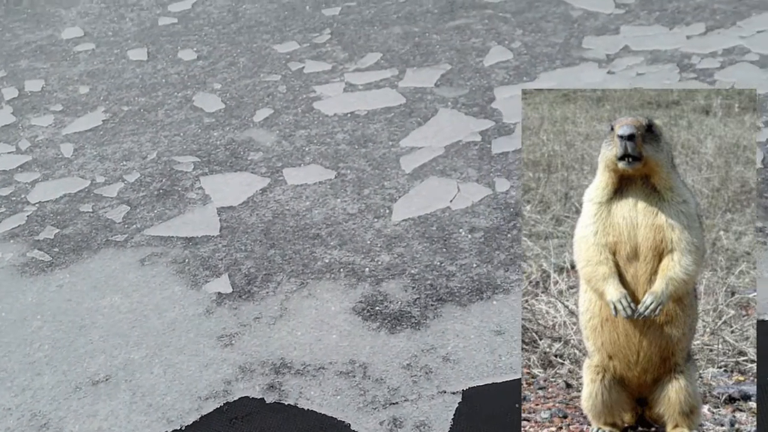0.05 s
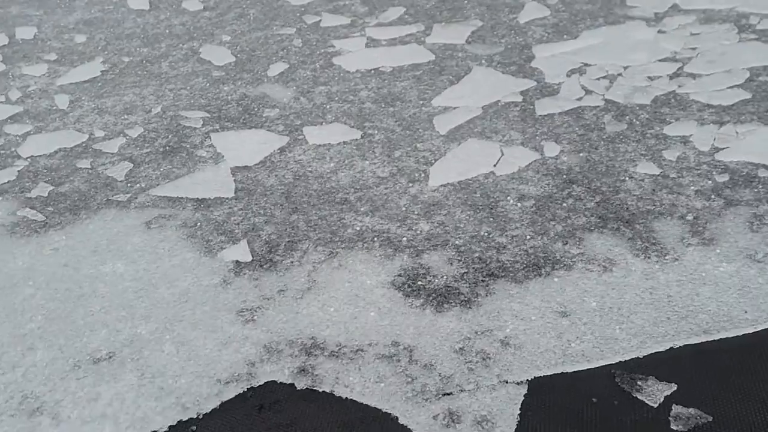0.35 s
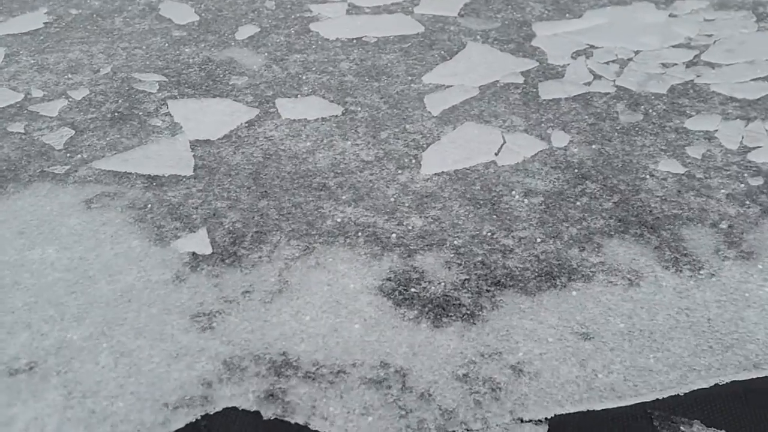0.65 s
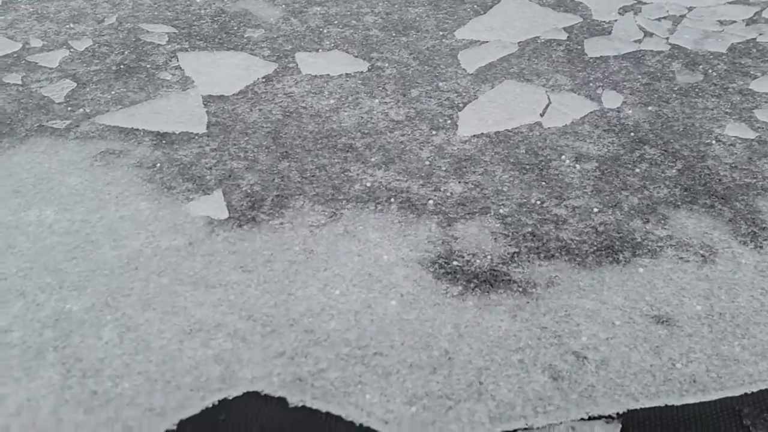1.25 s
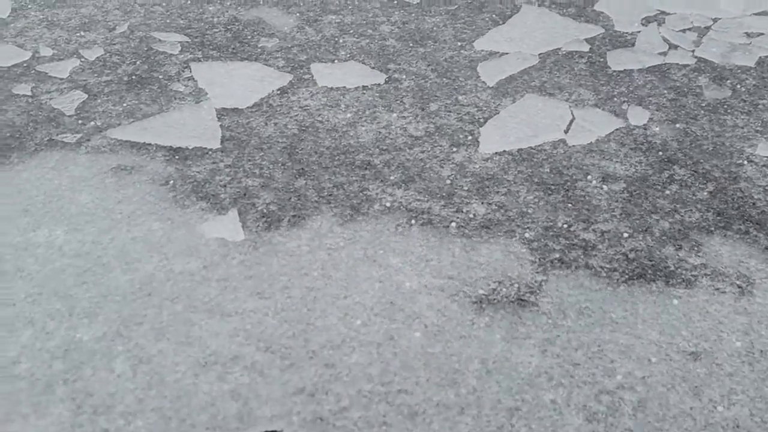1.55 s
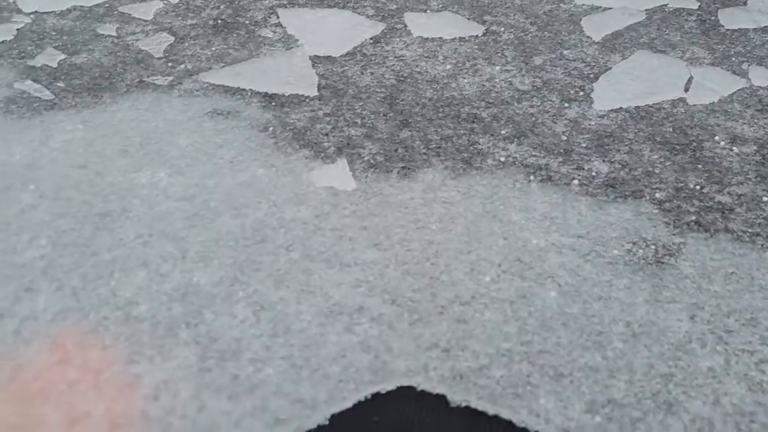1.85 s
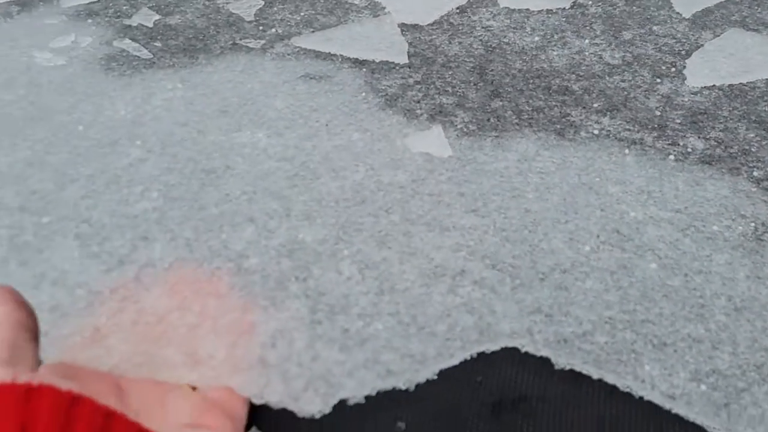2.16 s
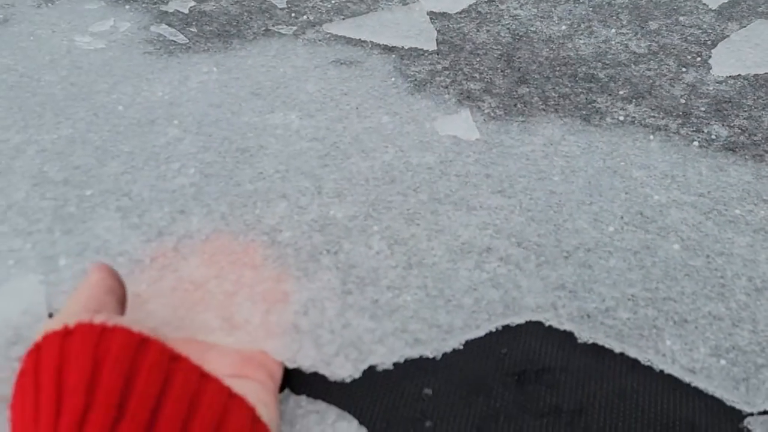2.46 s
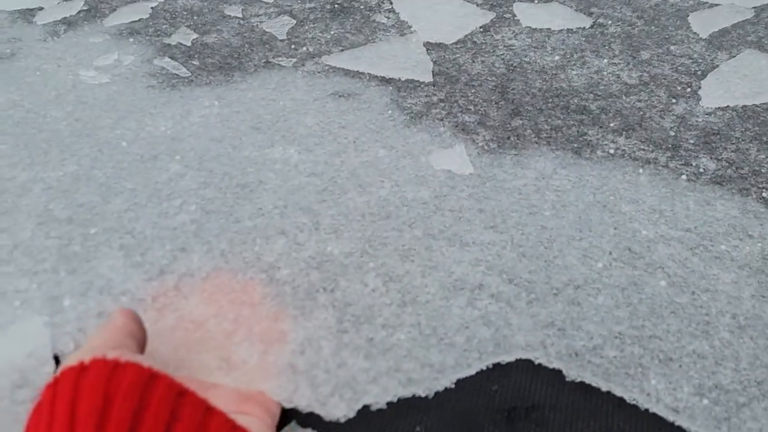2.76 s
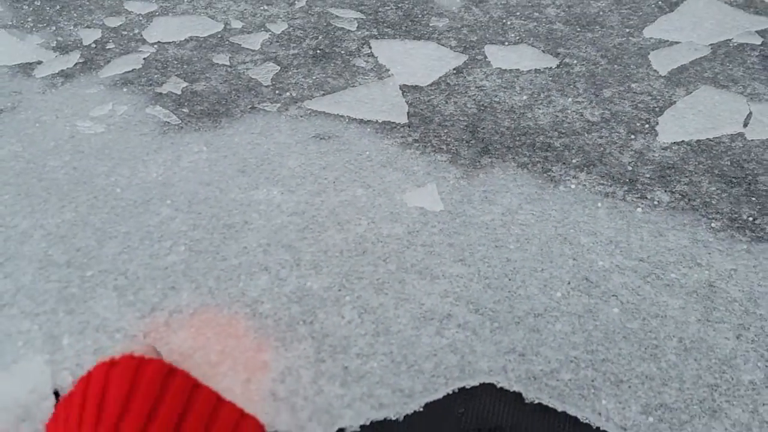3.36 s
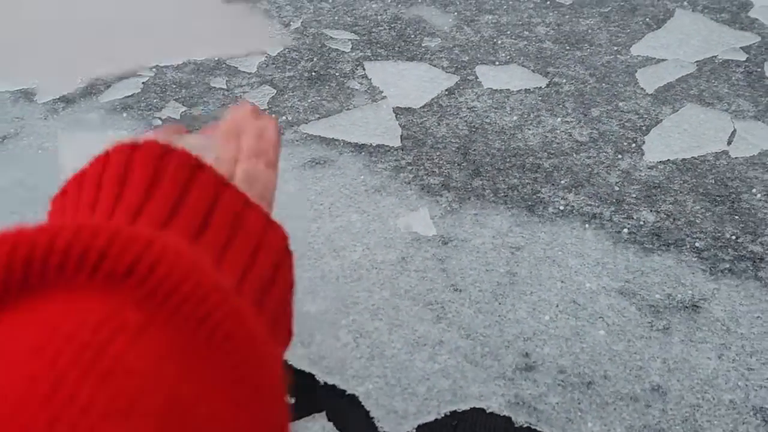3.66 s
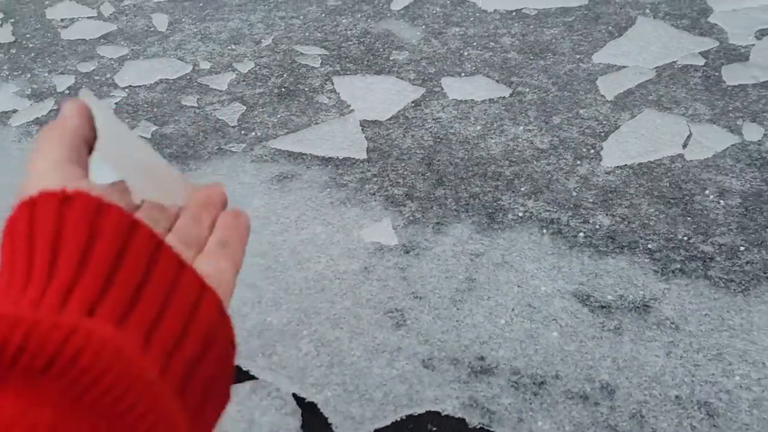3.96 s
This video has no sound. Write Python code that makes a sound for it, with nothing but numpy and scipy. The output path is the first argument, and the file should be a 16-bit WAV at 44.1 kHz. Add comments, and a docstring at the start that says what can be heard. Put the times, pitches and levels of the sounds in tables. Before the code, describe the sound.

Thin ice scrapes in short, soft shoves from about 0.2 seconds as a hand pushes it, with small ticks and clinking shards. The crackling thickens around 2.3 seconds and the sheet snaps at 2.8. Louder cracks follow at 3.5 and 3.7 seconds, then the pieces grind together and rock on the water with dull thuds. A low outdoor rumble and faint hiss run underneath.

```python
"""A hand pushes a sheet of thin ice over the water, outdoors and close by.
A low rumble and a faint hiss lie underneath throughout. From the start the strained sheet fizzes.
From 0.2 s it scrapes over loose ice in short shoves, and shards clink; from 0.7 s it ticks as it bends.
At 2.8 s it snaps, then harder at 3.5 and 3.7 s; the pieces grind together and rock on the water."""
import sys
import numpy as np
from scipy import signal
from scipy.fft import rfft, irfft, next_fast_len
from scipy.io import wavfile

SR = 44100
rng = np.random.default_rng(int(sys.argv[2]) if len(sys.argv) > 2 else 0)


def transcribe(signal):
    """Save signal, clipped to [-1, 1], as a 16-bit WAV file at the path in sys.argv[1]."""
    frames = np.atleast_2d(signal).T
    limited = np.clip(frames, -1, 1)
    pcm = np.round(limited * 32767).astype(np.int16)
    wavfile.write(sys.argv[1], SR, pcm)


N = 176400
T = np.arange(N) / SR

# ice fracture spectrum: f/Hz, level/dB
FRACTURE_SPECTRUM = [(100, -29.5), (330, -15), (520, -19), (900, -12), (1500, -6.5), (3200, 3.5), (6000, 3),
                     (7500, 5.5), (9500, -6.5), (12500, -8), (16000, -7)]
# low modes of the broken plates: f/Hz, level/dB, t60/s
PLATE_MODES = [(356, -2.5, 0.036), (623, -10.5, 0.046), (831, 0.5, 0.023), (1087, -5.5, .045),
               (1280, -13, 0.035)]


def from_db(db):
    return 10 ** (np.asarray(db) / 20)


def rms_one(x):
    return x / np.sqrt(np.mean(x ** 2) + 1e-20)


def at_hz(curve, hz):
    knots_hz, db = np.transpose(curve)
    return np.interp(np.log(hz + 1), np.log(knots_hz), db)


def colour(x, *curves):
    """Minimum-phase filter; gain is the sum of (f/Hz, level/dB) curves."""
    n = x.shape[-1]
    size = 2 * next_fast_len(n)
    hz = np.arange(size // 2 + 1) * SR / size
    cepstrum = irfft(np.log(from_db(sum(at_hz(c, hz) for c in curves))))
    cepstrum[1:size // 2] *= 2
    cepstrum[size // 2 + 1:] = 0
    return irfft(rfft(x, size) * np.exp(rfft(cepstrum)))[..., :n]


def flutter(spread_db, per_s):
    """Randomly wavering gain, rms 1."""
    knots = rng.standard_normal(N // 40)
    drift = rms_one(np.interp(T * per_s, np.arange(len(knots)), knots))
    return rms_one(from_db(spread_db * drift))


def stereo(three, likeness, pan_db=0):
    """Mix a shared signal with one per side; pan is left minus right."""
    mixed = np.sqrt(likeness) * three[0] + np.sqrt(1 - likeness) * three[1:]
    return mixed * from_db([[pan_db / 2], [-pan_db / 2]])


def grains(per_s, spread_db):
    """Three trains of random clicks of uneven size."""
    shape = (3, N)
    sizes = from_db(spread_db * np.minimum(rng.exponential(1, shape), 4)) * rng.choice([-1, 1], shape)
    return sizes * (rng.random(shape) < per_s / SR)


def swells(rows):
    """Rounded envelope from rows of peak t/s, width/s, level/dB."""
    return np.sqrt(sum((from_db(db) / np.cosh(np.clip(1.205 * (T - s) / width_s, -20, 20))) ** 2
                       for s, width_s, db in rows))


def decays(rows):
    """Sudden-onset envelope from rows of t/s, decay/s, level/dB."""
    return np.sqrt(sum((from_db(db) * (T >= s) * np.exp(-abs(T - s) / decay_s)) ** 2
                       for s, decay_s, db in rows))


def texture(three, spectrum, likeness, pan_db=0):
    """Three signals to coloured stereo, rms 1."""
    return rms_one(colour(stereo(three, likeness, pan_db), spectrum))


def noise_bed(spectrum, likeness, pan_db):
    return texture(rng.standard_normal((3, N)), spectrum, likeness, pan_db)


def ring(x, hz, t60_s):
    """One mode driven by x, rms 1."""
    r = from_db(-60 / (t60_s * SR))
    return rms_one(signal.lfilter([1, 0, -1], [1, -2 * r * np.cos(2 * np.pi * hz / SR), r * r], x + 1e-18))


def rumble():
    """Steady low noise, nearly alike on both sides."""
    # f/Hz, level/dB
    spectrum = [(20, -10.5), (30, -12), (39, 2), (48, 0), (60, -5), (76, -5), (95, -3), (120, -15),
                (170, -24.5), (300, -38), (800, -59.5)]
    return from_db(-46) * noise_bed(spectrum, likeness=0.92, pan_db=1.8)


def air():
    """Faint, wide hiss that slowly sinks."""
    # f/Hz, level/dB
    spectrum = [(100, 3.5), (300, 10), (600, 2.5), (1300, -2.5), (1900, 3), (2500, -7), (3300, -4.5),
                (4500, -12.5), (7500, -8.5), (10000, -17), (16000, -18)]
    fade_db_per_s = 1.65
    return from_db(-60 - fade_db_per_s * T) * noise_bed(spectrum, likeness=0.11, pan_db=1.0)


def fizz():
    """Tiny fractures in the strained sheet ring in a wandering band, among sparser hairline ticks."""
    # t/s, level/dB, centre f/Hz
    track = [(0, -70, 2630), (.52, -70.5, 3350), (1.15, -74, 3900), (1.36, -59.5, 3900), (1.55, -69, 4000),
             (2.1, -71.5, 3620), (2.27, -61, 3900), (2.35, -49.5, 3520), (2.44, -59.5, 4000),
             (2.66, -66.5, 3870), (2.81, -52, 4170), (3.15, -62, 3830), (3.25, -60.5, 3730),
             (3.36, -59.5, 4020), (4, -50, 3540)]
    s, db, hz = np.transpose(track)
    pole_width_hz = 1000
    clicks = stereo(grains(per_s=1200, spread_db=8), likeness=0.056, pan_db=-0.5)
    carrier = np.exp(2j * np.pi * np.cumsum(np.interp(T, s, hz)) / SR)
    r = np.exp(-np.pi * pole_width_hz / SR)
    baseband = signal.lfilter([1], [1, -2 * r, r * r], clicks / carrier)
    band = rms_one((baseband * carrier).real)
    ticks = texture(grains(per_s=180, spread_db=2.5), FRACTURE_SPECTRUM, likeness=0.13, pan_db=5)
    return from_db(np.interp(T, s, db)) * (band + ticks)


def scraping():
    """Each shove over loose ice sticks and slips: a dull rub with bright grit on top."""
    # peak t/s, width/s, rub level/dB, grit level/dB
    shoves = [(0.197, 0.035, -45.5, -50.5), (0.277, 0.0062, -47.5, -43.5), (0.33, 0.04, -55, -57),
              (0.414, 0.013, -47.5, -50.5), (0.508, 0.1, -64.5, -87), (0.699, 0.033, -53, -51),
              (0.827, 0.019, -51.5, -47), (0.911, 0.022, -59, -59.5), (1.023, 0.023, -58, -51.5),
              (1.105, 0.036, -65, -57.5), (1.233, 0.026, -60.5, -49.5), (1.328, 0.033, -52.5, -51),
              (1.393, 0.0058, -47.5, -47), (1.439, 0.045, -57.5, -55), (1.591, 0.014, -58, -54),
              (1.68, 0.012, -48.5, -46.5), (1.743, 0.0055, -64, -53), (1.852, 0.012, -54.5, -44),
              (1.902, 0.014, -55.5, -44), (1.973, 0.015, -50, -48.5), (2.199, 0.0062, -58, -47.5),
              (2.339, 0.039, -66, -48)]
    # f/Hz, level/dB
    rub_spectrum = [(120, 2.5), (330, -1.5), (480, -9.5), (560, -0.5), (1050, -3), (1500, -6), (1950, -8),
                    (3000, -13.5), (6000, -32)]
    # f/Hz, level/dB
    grit_spectrum = [(800, -18), (1900, -7.5), (2800, -3.5), (4100, 0), (5600, -2.5), (7400, -2.5),
                     (9500, -8.5), (13000, -7.5), (16000, -8)]
    rub = texture(grains(per_s=5000, spread_db=4.5), rub_spectrum, likeness=0.83, pan_db=2.5)
    grit = texture(grains(per_s=600, spread_db=4.5), grit_spectrum, likeness=0.077, pan_db=-0.3)
    grit = rms_one(grit + from_db(-4) * chips())
    stick_slip = flutter(spread_db=2.3, per_s=190)
    rows = np.array(shoves)
    return stick_slip * (rub * swells(rows[:, :3]) + grit * swells(rows[:, [0, 1, 3]]))


def chips(count=12, t60_cycles=41):
    """Tiny chips of many sizes ring within the grit, each click striking one; rms 1."""
    clicks = grains(per_s=260, spread_db=2.5)
    struck = rng.integers(0, count, N)
    pitches_hz = np.geomspace(1787, 5560, count)
    rings = sum(ring(clicks * (struck == k), hz, t60_cycles / hz) for k, hz in enumerate(pitches_hz))
    return rms_one(stereo(rings, likeness=0.51))


def clinks(t60_s=0.017, mode_spacing=0.14):
    """Loose shards knock together; each rings briefly in three close modes."""
    # t/s, f/Hz, level/dB
    hits = [(.276, 900, -42), (.284, 850, -32), (0.413, 1170, -36.5), (.708, 556, -36), (1.097, 2880, -46),
            (0.904, 3130, -39.5), (0.99, 4040, -39.5), (1.298, 4060, -38.5), (1.381, 4200, -42),
            (1.39, 4010, -34), (1.423, 4200, -40), (1.904, 2330, -38.5), (1.972, 1830, -33),
            (1.974, 1010, -36), (2.131, 2900, -43), (2.178, 4000, -42.5), (2.3591, 3360, -30.5),
            (3.3667, 1400, -35.5), (3.727, 3590, -18)]
    out, t = np.zeros((2, N + SR)), T[:4000]
    for s, hz, db in hits:
        offsets = np.array([[-1], [0], [1]]) + rng.uniform(-0.33, 0.059, (3, 1))
        modes_hz = hz * (1 + mode_spacing * offsets)
        phases = rng.random((3, 1)) + rng.normal(0, 0.14, (2, 3, 1))
        tone = np.sum(np.array([[.5], [1], [.5]]) * np.sin(2 * np.pi * (modes_hz * t + phases)), axis=1)
        start = int(s * SR)
        out[:, start:start + len(t)] += tone * from_db(db - 60 * t / t60_s)
    return out[:, :N] * from_db([[1], [-1]])


def cracks(gain_db=12.5, left_lag_s=0.0001):
    """Each fracture is a brief dry tear that builds to a snap and leaves a short tail in the sheet."""
    # t/s, relative level/dB, bass/dB, treble/dB, pan/dB
    fractures = [(0.702, -25, 12, -4, 1.5), (.747, -33.5, 0, -0.5, 2), (.819, -28, -6, -2, 0),
                 (.988, -30, -1, -6.5, 12), (1.244, -26, 1, 4.5, -1), (1.299, -42, -5, 7.5, -1),
                 (1.389, -35, -6, 3, 0), (1.577, -34, 14, 4, 2), (1.662, -22, 10, -0.5, 0),
                 (1.671, -27.5, 15, 1.5, 9.5), (1.973, -31, 18, 4, 2), (2.289, -22, 6.5, -2, 0.5),
                 (2.313, -21.5, 10.5, 3.5, 8), (2.344, -27, 1, -12, 11), (2.3596, -28, -7, -15, 5),
                 (2.368, -21.5, 3.5, 1, 7), (2.381, -26, 3, 6, -1), (2.408, -24, 7, 9, 8),
                 (2.536, -20.5, 7, 4.5, 6), (2.764, -22, -11, 3, 27.5), (2.7657, -11.5, 3, 6, 4),
                 (2.772, -22.5, 8, 8.5, 13), (2.891, -25.5, -17, 5, 6.5), (2.9402, -15, 7, 11, 9),
                 (2.9437, -21, 3, 8.5, 19), (2.9481, -14.5, 6, -3, -1), (2.965, -25, 17, 10.5, -1.5),
                 (2.988, -24.5, -5, 3.5, 20), (2.9941, -24, 10, 5.5, 0.5), (3.012, -40, -3, 14, -1),
                 (3.0244, -26.5, 3, 7.5, 15.5), (3.0286, -24, 4.5, 2, 1), (3.231, -20.5, -30, -16, 9.5),
                 (3.365, -13.5, -2, -10, 2.5), (3.4494, -31.5, 1, 9, 9), (3.467, -22.5, 4.5, 0.5, 24),
                 (3.477, -14.5, 0, 11.5, 11.5), (3.4791, -5, -1.5, -4, 14), (3.4821, -20, 2, -7, -6),
                 (3.4856, -9.5, 8, -20, -3), (3.5005, -14, 16, 2, 1), (3.5035, -13.5, 22, 10.5, -5),
                 (3.509, -15.5, 4, 8.5, 3), (3.578, -33.5, 26, 14, 0), (3.725, -7.5, 18, 3, 5.5),
                 (3.7277, -3, 2.5, -20, -1.5), (3.7497, -18, 28, -2.5, 5.5), (3.7757, -14, 22.5, -19, 2),
                 (3.7971, -24, 30, -16, 0), (3.8135, -23.5, 25, -0.5, 8), (3.927, -22, 8, 0.5, 3),
                 (3.9606, -8.5, 19.5, -10, 2), (3.972, -19, 15.5, -3, -19)]
    build_s, tear_s, tail_s = 0.00045, 0.00062, 0.0045
    snap_db, tail_db = 5, -15.5
    bass_shelf_hz, treble_shelf_hz = (900, 3150), (4000, 7560)
    out, t = np.zeros((2, N + SR)), T[:3000] - .005
    after = np.maximum(t, 0)
    fall = np.exp(-after / tear_s) + from_db(tail_db) * np.exp(-after / tail_s)
    envelope = np.exp(np.minimum(t, 0) / build_s) * fall
    for s, db, bass_db, treble_db, pan_db in fractures:
        burst = rng.standard_normal((3, len(t))) * envelope
        burst[0, np.argmax(envelope)] += from_db(snap_db)
        burst = stereo(burst, likeness=0.3)
        burst /= np.linalg.norm(burst, axis=1, keepdims=True)
        bass = list(zip(bass_shelf_hz, (bass_db, 0)))
        treble = list(zip(treble_shelf_hz, (0, treble_db)))
        burst = from_db(db + gain_db) * colour(burst, FRACTURE_SPECTRUM, bass, treble)
        start = int((s + t[0]) * SR)
        out[:, start:start + len(t)] += burst * from_db([[pan_db / 2], [-pan_db / 2]])
    return np.array([np.interp(T - left_lag_s, T, out[0, :N]), out[1, :N]])


def thuds():
    """The sheet rocks on the water: swells of low noise."""
    # peak t/s, width/s, level/dB
    rockings = [(1.39, 0.077, -48.5), (2.768, 0.0074, -36.5), (3.525, 0.027, -35), (3.58, 0.014, -35),
                (3.633, 0.02, -31.5), (3.85, 0.16, -50.5), (3.985, 0.0094, -32)]
    # f/Hz, level/dB
    spectrum = [(30, -14), (55, 2.5), (85, 3), (130, -7.5), (195, -4), (250, -12), (335, -5.5), (480, -21),
                (1500, -42.5)]
    return swells(rockings) * noise_bed(spectrum, likeness=0.6, pan_db=-0.5)


def knocks(water_damping_s=0.01):
    """A break right through jolts the plate; the water soon damps its low modes."""
    # t/s, level/dB
    jolts = [(2.7656, -36.5), (3.503, -23.5), (3.7243, -21), (3.7275, -20)]
    out, t = np.zeros(N + SR), T[:4000]
    tone = sum(from_db(db - 60 * t / t60_s) * np.sin(2 * np.pi * hz * t) for hz, db, t60_s in PLATE_MODES)
    tone *= np.exp(-t / water_damping_s)
    for s, db in jolts:
        start = int(s * SR)
        out[start:start + len(t)] += from_db(db) * tone
    return out[:N]


def crumbling():
    """Broken edges grind in lurches, ring the plates and shed splinters."""
    # t/s, decay/s, grind level/dB, splinter level/dB
    breaks = [(2.769, 0.028, -51, -39), (3.473, 0.013, -41, -17), (3.503, 0.018, -29.5, -19),
              (3.526, 0.066, -44, -35), (3.609, 0.18, -51, -44.5), (3.722, 0.036, -27.5, -36),
              (3.769, 0.054, -37, -41.5), (3.822, 0.14, -36, -45), (3.96, 0.021, -34.5, -28.5)]
    # f/Hz, level/dB
    grind_spectrum = [(80, -11), (195, 8), (250, -18), (335, 6), (480, -11.5), (560, 1), (840, -6.5),
                      (1400, -2), (2200, -11), (3500, -15), (7000, -41)]
    # f/Hz, level/dB
    splinter_spectrum = [(800, -4.5), (2000, -1.5), (2900, 3), (4500, 0), (7500, 0.5), (9500, -10),
                         (13000, -4.5), (16000, -13)]
    crumbs = grains(per_s=2000, spread_db=5)
    edge = stereo(crumbs, likeness=0.93)
    plates = sum(from_db(db) * ring(edge, hz, t60_s) for hz, db, t60_s in PLATE_MODES)
    grind = rms_one(texture(crumbs, grind_spectrum, likeness=0.56) + from_db(-5) * plates)
    splinters = texture(grains(per_s=1300, spread_db=3.5), splinter_spectrum, likeness=0.15, pan_db=2)
    lurch = flutter(spread_db=3.5, per_s=140)
    rows = np.array(breaks)
    return lurch * (grind * decays(rows[:, :3]) + splinters * decays(rows[:, [0, 1, 3]]))


def scene():
    return rumble() + air() + thuds() + cracks() + knocks() + clinks() + scraping() + crumbling() + fizz()


def record(dry, cutoff_hz=16300):
    """Close microphone ports narrow the bass; the loudest peaks are rounded and the top is cut."""
    # f/Hz, side level/dB
    width = [(100, -4.5), (300, -8.5), (600, 0), (1100, 3), (2000, 1)]
    mid = (dry[0] + dry[1]) / 2
    side = colour((dry[0] - dry[1]) / 2, width)
    rounded = np.tanh(np.array([mid + side, mid - side]))
    low_pass = signal.firwin(255, cutoff_hz, fs=SR, window=("kaiser", 8))
    return signal.fftconvolve(rounded, low_pass[None], mode="same", axes=1)


dry = scene()
out = record(dry)
transcribe(out)
```